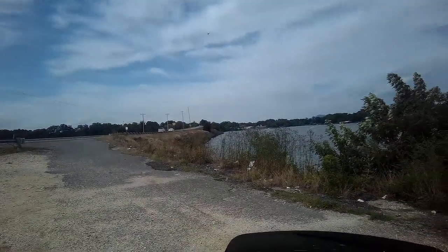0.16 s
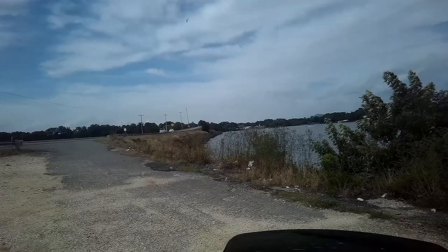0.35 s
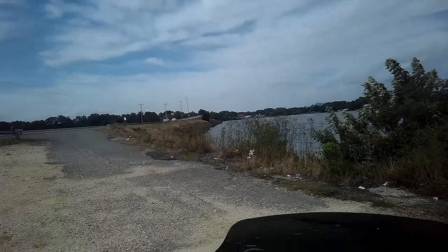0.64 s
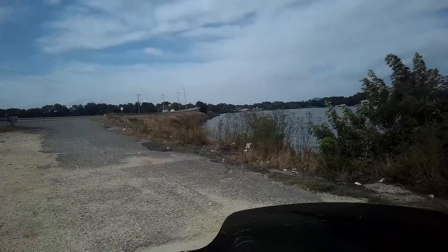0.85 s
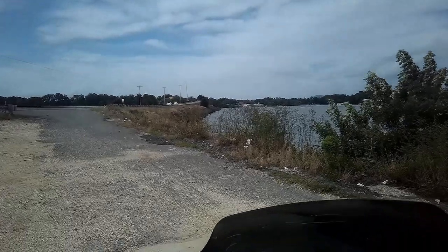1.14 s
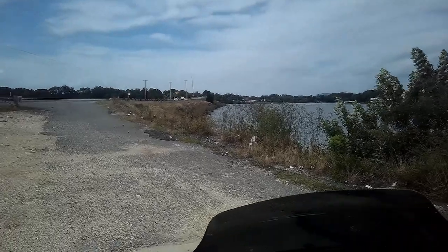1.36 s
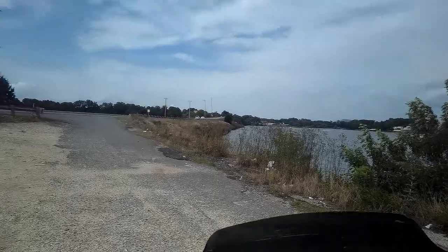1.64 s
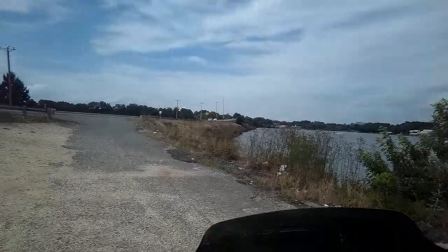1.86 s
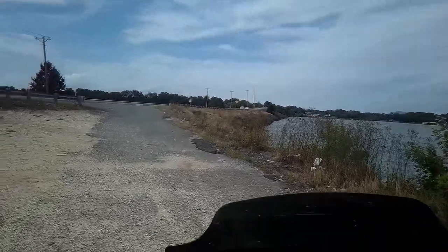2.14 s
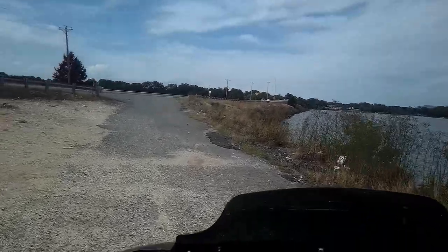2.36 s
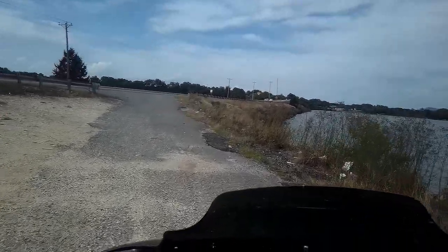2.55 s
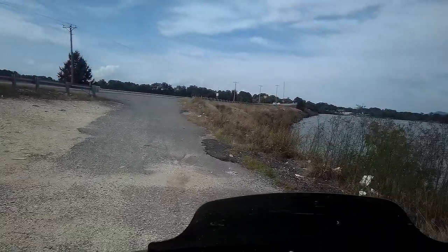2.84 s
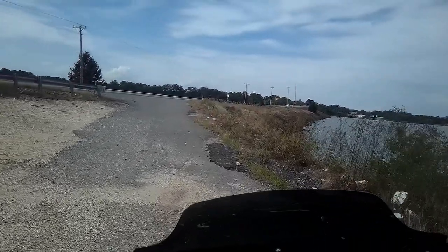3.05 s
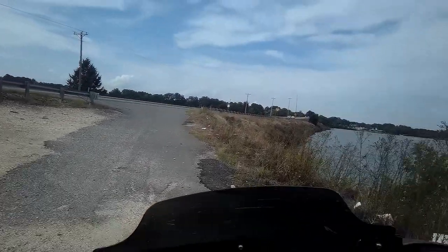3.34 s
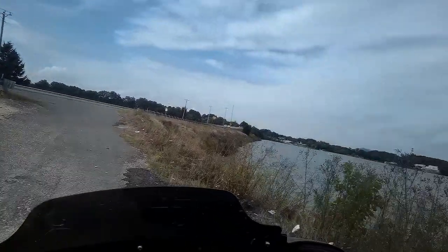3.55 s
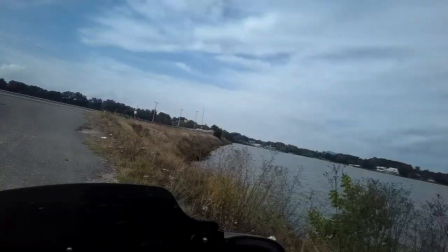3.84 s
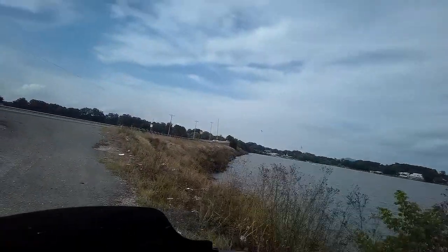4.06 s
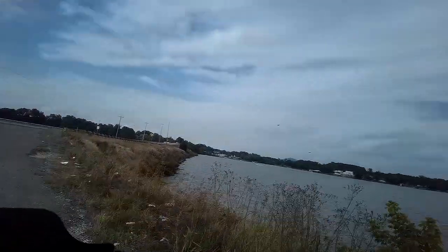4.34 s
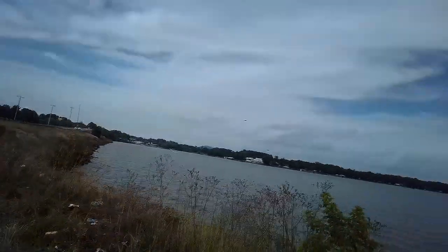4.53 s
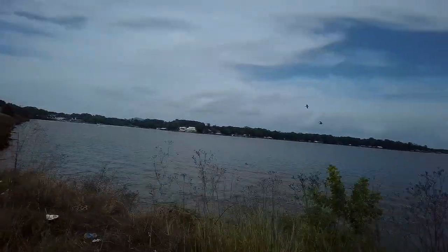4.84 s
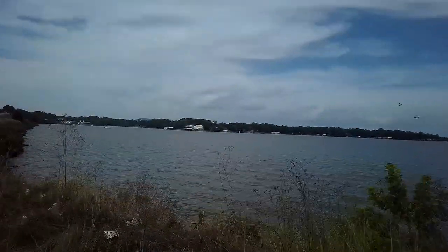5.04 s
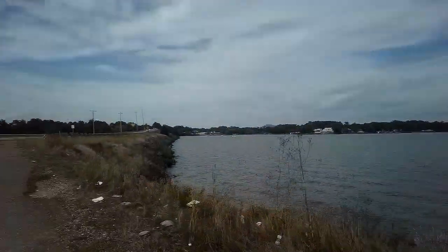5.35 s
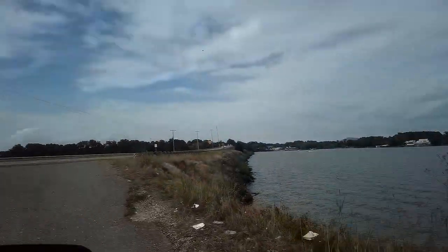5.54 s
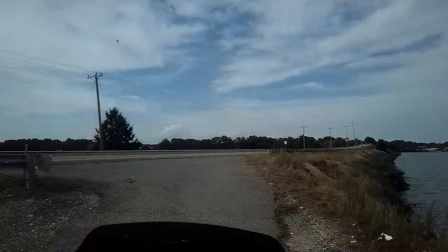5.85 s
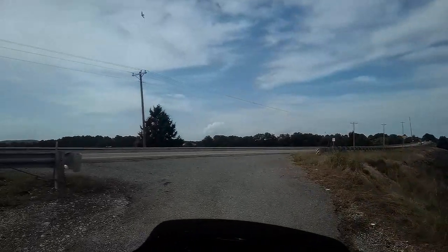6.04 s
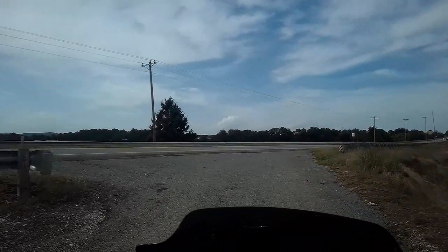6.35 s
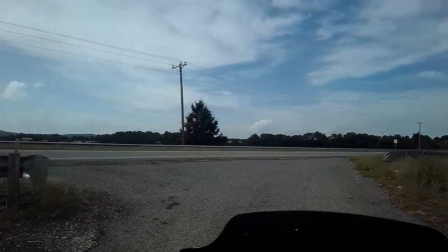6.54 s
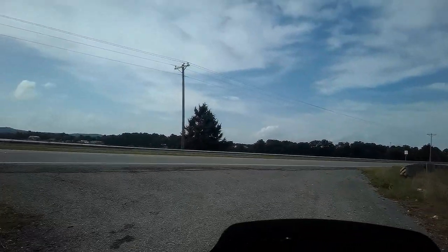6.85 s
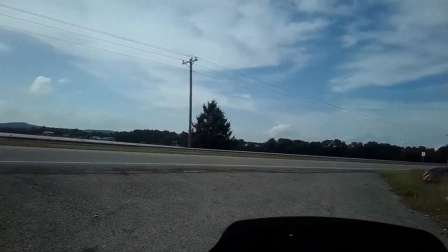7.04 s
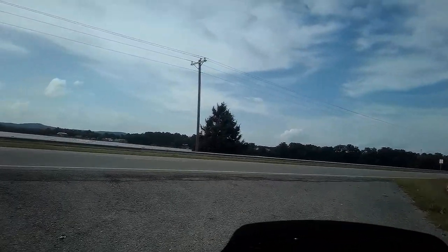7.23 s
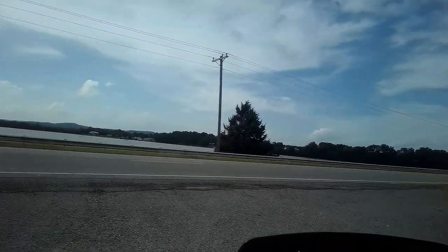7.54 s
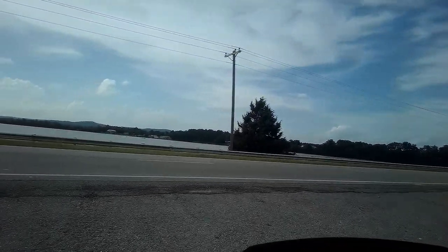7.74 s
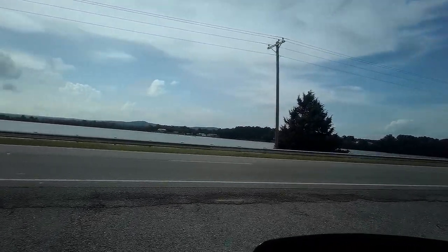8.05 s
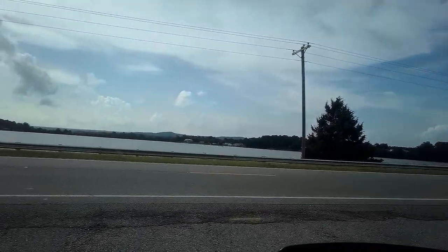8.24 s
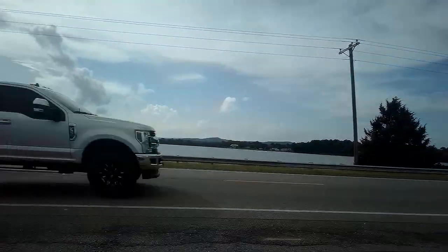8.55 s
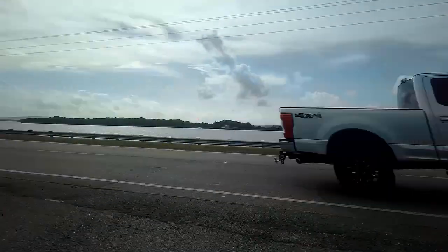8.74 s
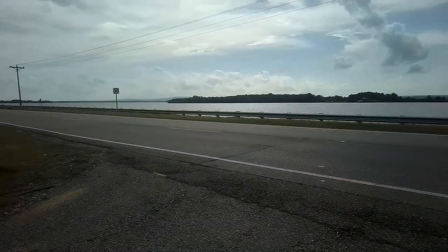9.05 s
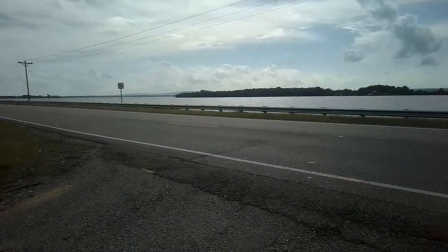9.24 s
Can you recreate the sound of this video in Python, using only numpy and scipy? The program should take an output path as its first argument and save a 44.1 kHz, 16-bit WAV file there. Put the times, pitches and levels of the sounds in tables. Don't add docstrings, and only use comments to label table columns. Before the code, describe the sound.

Close to the rider's head, a large twin-cylinder motorcycle starts in a slow lumpy idle, surges with a throttle blip, and chugs steadily up a lakeside track. Loose metal jingles and valve gear clatters above heavy exhaust thumps. It drops to uneven idle with small clicks, and a pickup passes in a rush of tyre roar and hiss, right to left.

```python
import sys
import numpy as np
from scipy import signal
from scipy.fft import rfft, irfft, next_fast_len
from scipy.io import wavfile
from scipy.ndimage import uniform_filter1d

SR = 44100
rng = np.random.default_rng(int(sys.argv[2]) if len(sys.argv) > 2 else 0)


def ratio(d):
    e = np.asarray(d, float) / 20
    return 10 ** e


def generate_wav(sig):
    pcm = np.round(np.clip(np.atleast_2d(sig).T, -1, 1) * 32767).astype(np.int16)
    wavfile.write(sys.argv[1], SR, pcm)


N = 414090
TIME = np.arange(N) / SR
SIZE = next_fast_len(N)

# start_s, level_db
LOAD = [(0.85, -11), (1.05, -11), (1.6, -11), (2.0, -11.5), (2.55, -11), (2.75, -13.5), (3.4, -13),
        (4.2, -12.5), (4.45, -11), (5.0, -11.5), (5.6, -12), (6.2, -12), (6.9, -12)]
# start_s, speed_rpm
RPM = [(0.88, 1208.5), (0.94, 1457.3), (1.2, 1690.5), (1.3, 1831.1), (1.74, 1476.6), (2.0, 1424.2),
       (2.47, 1470.7), (2.53, 1493.7), (2.77, 1315.9), (3.08, 1301.0), (3.2, 1320.0), (3.85, 1343.1),
       (3.98, 1300.7), (4.35, 1428.7), (5.23, 1596.4), (6.12, 1714.4), (6.91, 1719.5)]
# front_s, front_db, rear_later_s, rear_db
IDLE = [(0.009, -20.5, .087, -25), (0.197, -19.5, .078, -18), (0.367, -16, .0785, -30),
        (0.549, -15, .061, -15.5), (0.684, -13, .046, -10.5), (0.787, -11.5, .041, -12),
        (6.897, -18.5, 0.039, -11), (6.993, -14.5, 0.03, -14), (7.08, -20, .0413, -17),
        (7.183, -22, .0518, -20), (7.295, -14.5, .0608, -22), (7.43, -17, .08, -21),
        (7.588, -16.5, .0785, -18), (7.762, -18, .0796, -19), (7.952, -16, .0758, -29),
        (8.125, -17, 0.063, -20.5), (8.308, -17, 0.066, -27), (8.488, -16.5, .0722, -18.5),
        (8.651, -19, 0.078, -25), (8.833, -16, .0792, -21), (9.014, -17, .0658, -25),
        (9.192, -17, .0711, -19.5), (9.363, -16, .07, -20)]
# start_s, extra_gas_db, extra_clatter_db
HARD = [(0.275, 6, 10), (0.366, -1, 1), (0.549, 2.5, -1.5), (0.61, -1.5, 7.5), (0.684, 3, 2),
        (0.73, 5.5, 3), (0.828, 5, 0.5), (0.919, 5, 2.5), (0.996, 6, 2.5), (1.081, 5.5, 3.5),
        (1.149, 4.5, -1), (1.423, 2.5, -2.5), (1.493, -2, -3.5), (1.535, 0, -0.5), (1.566, 1.5, -1),
        (1.611, 2.5, 4.5), (1.641, 0, -0.5), (1.688, 0.5, 5), (1.969, 5.5, 2.5), (2.1, 2.5, 3),
        (2.302, 3.5, -5.5), (2.384, 5, -4), (2.466, 5, -2), (2.768, 3, -5.5), (5.11, 1, 4),
        (5.184, -1, 6.5), (5.405, 1, 7.5), (5.729, 2.5, 0), (6.365, 3, -6), (7.297, -2.5, 3.5)]
# full_blow_db, slope_db_per_db
FOLLOW = [
    (-21.5, 4),
    (-31, 1.5),
    (-48.5, 1.4),
]
# pitch_hz, level_db, decay_s, rise_per_cycle
THUMP = [
    [(61.5, 3, 0.093, 0.44), (151.5, -5, 0.1, 0.022)],
    [(79.3, 4, 0.12, 0.32), (154.2, -4.5, 0.098, 0.45)],
]
# pitch_hz, level_db, decay_s, rise_per_cycle
CRACK = [
    [(128.5, 5.5, 0.099, 0.29), (211.2, 5.5, 0.018, 0.69), (285, 0.5, 0.019, 0.092)],
    [(133.2, 11, 0.016, 0.56), (248.6, 4.5, 0.018, 0.24), (381, -8.5, 0.027, 0.24)],
]
VALVE_SHUT = (.54, .46)
# pitch_hz, level_db, decay_s
SHUT_RING = [
    (106, -10.5, 0.15),
    (140.2, -8.5, 0.024),
]
# pitch_hz, level_db
GAS_COLOUR = [(280, -18.5), (470, 1), (525, -12.5), (585, -6.5), (684, -9.5), (788, -0.5), (885, -9.5),
              (1040, -5.5), (1210, -9.5), (2200, -19), (2860, -46.5), (4840, -120)]
# pitch_hz, width_hz, level_db
SHELL_PEAKS = [(770, 70, -6), (1060, 38, -3.5), (589, 11, -8)]
# pitch_hz, level_db, decay_s
STRUCK = [(411, -8, 0.014), (591.4, -11, 0.068), (737, -4, 0.018), (1009, -6, 0.012), (1322, -14.5, 0.02),
          (1947, -20.5, 0.0025), (2760, -20.5, 0.0034), (3140, -13.5, 0.0066), (5550, -23.5, 0.0057)]
# pitch_hz, level_db
CLATTER_COLOUR = [(880, -28.5), (1500, -1.5), (2520, -4.5), (2780, -5), (3250, -10), (4150, -11.5),
                  (4550, -18), (5300, -11.5), (7520, -17.5), (8710, -21.5), (14500, -27), (15500, -34)]
# pitch_hz, width_hz, level_db
COVER_RING = (3380, 960, 6.2)
# teeth_per_cycle, level_db
DRIVE = [(14, -32), (17, -24.5), (19, -34.5), (23, -36), (27, -39), (33, -43.5)]
# teeth_per_cycle, level_db, slope_db_per_100_rpm
GEARS = [(25, -41.5, 0.5), (27, -41.5, 0.5), (39, -42.5, -2), (52, -44.5, -1.5)]
# pitch_hz, left_minus_right_db
HEAD_SHADE = [(60, -4), (110, 0), (200, -2), (380, -3.5), (700, -11), (1290, -6.5), (2380, -3), (4400, 1),
              (8120, 11.5), (15000, -1.5)]
# start_s, peak_db, body_db, top_db (both relative), left_minus_right_db
TICKS = [(7.072, -36, -12, -15, 2.5), (7.221, -36.5, -5.5, -10, 6), (7.2716, -31.5, -9, -19, 1),
         (7.333, -35, -6, -20, 4.5), (7.4114, -32.5, 1, -13, 1), (7.457, -41.5, -4, -16.5, 1.5),
         (7.52, -46, -4, -11.5, 2.5), (7.59, -54, 35.5, -20, 6), (7.63, -42.5, -6, -14, 0),
         (7.656, -58, 35.5, -29, -5), (7.9924, -33.5, 1, -19.5, -2), (8.346, -39, -5, -11.5, 5),
         (8.528, -38, -5, -18, 6.5), (8.555, -39, 6, -31, 2), (8.944, -38, -5, -27, -6.5),
         (9.056, -37.5, -2, -25.5, 5), (9.1224, -39, 2, -26, 7), (9.258, -36, 14, -13, 9),
         (9.304, -37, 5, -27, 10)]
# start_s, pitch_hz, level_db
LEVER = [
    (7.272, 2400, -40.5),
    (7.658, 2870, -38),
    (8.554, 2870, -36),
]
# start_s, peak_db, pitch_hz,
# left_minus_right_db
JINGLE = [(0.1967, -47, 2950, -3), (0.273, -36, 2450, -11), (0.3658, -34.5, 2990, -1),
          (0.5477, -45, 3170, 2), (0.612, -30.5, 2840, -13), (0.6813, -29.5, 2950, -9),
          (0.6982, -32.5, 2780, -6), (0.7275, -41, 3210, -8.5), (0.8246, -32.5, 2770, -15),
          (0.878, -35.5, 3180, -6), (0.9146, -32, 2950, -9), (1, -32.5, 2630, -12), (1.0428, -38, 2430, -1),
          (1.0762, -24, 2760, -5), (1.1937, -42, 3140, 1), (1.694, -23, 3210, 4.5), (1.7822, -25, 3200, -5),
          (1.856, -25.5, 2900, -3), (1.9404, -25, 3230, -6), (1.9686, -28, 2900, -5.0),
          (2.1058, -35, 2760, -6), (2.14, -35.5, 2620, -10.5), (2.1884, -29.5, 2620, -4),
          (2.304, -30.5, 2870, -9), (2.4361, -32, 2930, -2), (2.4671, -28.5, 2640, -8),
          (2.515, -33, 3210, -3), (2.5477, -32, 3020, -7), (2.7167, -33, 2550, 0), (2.7744, -35, 2930, 0),
          (2.8992, -34, 3060, -11.5), (2.9924, -38, 3090, -5), (3.0822, -35, 2970, -12),
          (3.1374, -34.5, 3500, -4), (3.177, -36.5, 3520, -3), (3.3216, -41, 2650, -7.5),
          (3.4119, -40, 2760, -8), (3.447, -38, 2630, -12), (3.5388, -41, 3140, -10),
          (4.2183, -35, 3160, -2.0), (4.3412, -31.5, 2650, -5), (4.831, -41, 3100, -5.0),
          (4.9514, -32.5, 2650, -6), (5.03, -31.5, 2720, -1), (5.108, -26, 2700, -7.5),
          (5.1809, -29.5, 2690, -8.5), (5.3314, -29.5, 2460, -8), (5.403, -39.5, 2940, 6),
          (0.215, -49, 2900, -7), (0.292, -39, 2670, -6), (0.312, -49, 2600, -5), (0.296, -42, 1690, -5),
         (0.387, -39, 3000, -5), (0.371, -42, 2300, -6), (0.385, -49, 1900, -2), (0.41, -51, 2660, -3),
         (0.567, -39, 3070, -9), (7.302, -47, 2850, 0), (7.587, -44, 2700, -5), (7.676, -42, 3120, -2)]
# start_s, level_db, lowest_ring_hz
BOOM = [(0.195, -25.5, 710), (0.271, -22, 740), (0.361, -28, 740), (0.546, -27, 720), (0.61, -16, 736),
        (0.678, -34, 777), (0.724, -12.5, 732), (0.784, -34, 790), (0.823, -18.5, 688), (0.876, -21.5, 765),
        (0.917, -14.5, 730), (0.996, -16, 735), (1.15, -21, 780), (1.327, -16, 740), (1.394, -21.5, 830),
        (1.423, -17.5, 836), (1.493, -19, 800), (1.535, -18.5, 824), (1.566, -20, 730), (1.611, -18, 875),
        (1.641, -18, 770), (1.721, -16, 753), (1.767, -20.5, 815), (1.849, -17, 828), (1.885, -19, 743),
        (1.932, -21.5, 685), (1.969, -29.5, 760), (2.016, -19.5, 758), (2.053, -16, 756), (2.1, -26, 836),
        (2.136, -24, 718), (2.184, -22.5, 660), (2.219, -18, 725), (2.302, -19.5, 733), (2.384, -20, 790),
        (2.431, -24, 826), (2.466, -19.5, 790), (2.547, -18, 720), (2.631, -23, 810), (2.718, -22.5, 820),
        (2.768, -27, 711), (3.225, -22.5, 732), (3.408, -25, 816), (3.861, -26.5, 860), (3.949, -26.5, 830),
        (4.129, -24, 790), (4.219, -25, 789), (4.634, -22, 685), (4.715, -25, 754), (4.916, -22.5, 767),
        (4.951, -20, 757), (5.729, -19.5, 774), (5.8, -17.5, 766), (5.871, -22, 759), (6.053, -28.5, 737),
        (6.294, -23.5, 805), (6.365, -18, 770), (6.544, -27.5, 830), (6.824, -24.5, 705), (7.272, -25, 760)]
# pitch_hz, level_db, decay_s
BOOM_MODES = [(728.6, -4, 0.012), (982, -6.5, .009), (1244, -12.5, .007), (1785, -15.5, 0.005)]
# start_s, peak_db, pitch_hz, left_minus_right_db
PING = [(0.2765, -53, 5300, 5), (0.6078, -52, 5550, 15.5), (0.73, -35, 5580, 12.5),
        (0.829, -36, 4980, 13.5), (1.197, -38.5, 6470, 9.5), (1.6472, -40, 4670, 4.5),
        (1.6932, -46, 4630, 8.5), (1.7801, -36.5, 5600, 5.5), (1.938, -41, 4940, 8),
        (2.0228, -40.5, 4980, 6.5), (2.0555, -42.5, 5700, 0), (2.1872, -43, 5170, 9),
        (2.271, -48.5, 4650, 9), (2.386, -47, 4640, 6.0), (2.4712, -42, 4900, 3.5), (2.518, -42.5, 5230, 9),
        (2.956, -41, 4940, 8.5), (3.1331, -52, 5490, 10.0), (3.6668, -47.5, 4610, 11),
        (4.0799, -46, 4940, 3.5), (4.5533, -46, 4450, 9.5), (4.6216, -40, 6200, 0),
        (4.7177, -43.5, 4470, 11), (4.8747, -46, 4520, 8.5), (4.953, -45.5, 4760, 6),
        (5.0312, -39.5, 6050, 15), (5.1063, -42, 4610, 8.5), (5.1847, -40, 4560, 6),
        (5.2582, -40.5, 5650, 4.5), (5.4096, -42.5, 4480, 11), (5.481, -44.5, 4480, 7),
        (6.0539, -46, 4730, 10.5), (6.1277, -47, 4740, 10), (6.2714, -44.5, 4870, 7.5),
        (6.3358, -47, 4600, 8.5), (6.6226, -42, 4570, 7), (6.674, -43.5, 4810, 8)]
# pitch_hz, level_db
AIR_COLOUR = [(120, -26.5), (200, -1.5), (231, -3), (422, -12.5), (702, -17.5), (975, -18.5), (1110, -20),
              (2340, -35.5), (3240, -36.5), (4580, -43), (15500, -62)]
# pitch_hz, level_db
ROAR_COLOUR = [(260, -36), (450, -10), (487, 2), (531, -9), (591, -1.5), (771, -1), (840, -2), (1140, -4),
               (2200, -27.5), (2860, -60), (4840, -120)]
PASS_S = 8.52, 8.82, 8.58, 9.3
# nearest_distance_s (time to cover it), nearest_db, louder_behind_db
PASSES = [
    (0.28, -28.5, 6.5),
    (0.18, -38, 0.5),
    (0.31, -51.5, 0.5),
    (0.26, -37.5, 6.5),
]
# middle_s, pitch_hz, length_s (from the middle out), level_db
TREAD = [
    (8.3, 916, .08, -38),
    (8.38, 735, .1, -29.5),
    (8.55, 720, 0.053, -45),
    (8.64, 865, 0.077, -33),
    (8.75, 660, 0.089, -39),
    (8.88, 512, .08, -39),
    (8.99, 560, .06, -33),
    (9.1, 855, 0.24, -35),
]

REAR_SHARE = 315 / 720
THROTTLE_S, CLUTCH_OUT_S, RIDE_CYCLES = 0.8812, 6.86, 76
MIC_LAG_S = -.0003


def unit(x):
    return x / np.sqrt(np.mean(x ** 2))


def on_hz(points):
    hz, db = np.transpose(points)
    return np.interp(np.log(np.fft.rfftfreq(SIZE, 1 / SR) + 1), np.log(hz), db)


def colour(x, points):
    return irfft(rfft(x, SIZE) * ratio(on_hz(points)), SIZE)[..., :N]


def band(x, lo_hz, hi_hz):
    return signal.sosfilt(signal.butter(2, [lo_hz, hi_hz], "bandpass", fs=SR, output="sos"), x)


def resonance(x, hz, width_hz, db):
    return ratio(db) * signal.lfilter(*signal.iirpeak(hz, hz / width_hz, SR), x)


def ramp(x):
    return 1 / (1 + np.exp(-x))


def sides(left_minus_right_db):
    return ratio(np.array([[left_minus_right_db], [-left_minus_right_db]]) / 2)


def walk(rate):
    k = int(SR / rate)
    return uniform_filter1d(np.repeat(rng.standard_normal(N // k + 1), k), k)[:N]


def both_mics(likeness):
    same, left, right = rng.standard_normal((3, N))
    c = np.clip(likeness, 0, 1)
    shared = np.array([same, np.roll(same, int(MIC_LAG_S * SR))])
    return np.sqrt(c) * shared + np.sqrt(1 - c) * np.array([left, right])


def add(out, at, x):
    i = int(at * SR)
    out[..., max(i, 0):i + x.shape[-1]] += x[..., max(-i, 0):N - i]


def mode(t, hz, db, decay, rise, cycle):
    t = np.maximum(t, 0)
    return ratio(db) * np.sin(2 * np.pi * hz * (t + rise * t * t / cycle / 2)) * np.exp(-t / decay)


def speed_rpm():
    return np.interp(TIME, *np.transpose(RPM))


def turns():
    return np.cumsum(speed_rpm() * (TIME >= THROTTLE_S)) / 120 / SR


def strokes():
    idle_pitch, idle_wander, full_db = .91, 0.04, -10
    coast_crack_db = 5
    cold_db, cold_s = 9.5, 4.3
    front = np.interp(np.arange(RIDE_CYCLES + 1) + 1e-6, turns(), TIME)
    ride = np.append(front[:-1], front[:-1] + REAR_SHARE * np.diff(front))
    first, first_db, later, later_db = np.transpose(IDLE)
    s = np.concatenate([ride, first, first + later])
    blow = np.concatenate([np.interp(ride, *np.transpose(LOAD)), first_db, later_db])
    idling = np.arange(len(s)) >= len(ride)
    chance = rng.standard_normal((len(s), 6)).T
    pitch = np.where(idling, idle_pitch + idle_wander * chance[5], 1 + .002 * chance[5])

    levels = np.array([blow, *(db + slope * (blow - full_db) for db, slope in FOLLOW)])
    levels = levels + np.array([[.4], [.6], [1.2], [1.8]]) * chance[:4]
    levels[1] += coast_crack_db * (s > CLUTCH_OUT_S + .2)
    levels[3] += cold_db * np.exp(-s / cold_s)
    for at, gas_db, clatter_db in HARD:
        levels[2:, np.argmin(abs(s - at))] += gas_db, clatter_db

    rows = np.vstack([s + .0001 * chance[4], levels, pitch])[:, np.argsort(s)][:, :-1]
    cycle = rows[0, 2:] - rows[0, :-2]
    cylinder = np.arange(rows.shape[1]) % 2
    return np.vstack([rows[0], cylinder, np.append(cycle, cycle[-2:]), rows[1:]]).T


def cycle_s(rows):
    return np.interp(TIME, rows[:, 0], rows[:, 2])


def rumble():
    return unit(band(rng.standard_normal(N), 22, 42)) * ratio(-35 + 2.7 * walk(5.4)) * sides(-5.2)


def air(rows):
    idle_db, per_octave_db, lag_s, road_db_s = -36.5, 5, 0.44, 0.25
    still_db, still_until_s = -4, 0.63
    octaves = uniform_filter1d(np.log2(0.2 / cycle_s(rows)), int(lag_s * SR))
    db = idle_db + per_octave_db * octaves + road_db_s * TIME
    db = db + still_db * ramp((still_until_s - TIME) / 0.0067)
    wash = unit(colour(both_mics(0.22), AIR_COLOUR)) * ratio(db + .5 * walk(3.9))
    return wash + band(both_mics(0), 9000, 15500) * ratio(-61.0)


def passing(at_s, reach_s, db, behind_db):
    spread = 1.46
    along = (TIME - at_s) / reach_s
    far = np.hypot(along, 1)
    return db - 20 * spread * np.log10(far) + behind_db * along / far


def doppler(x):
    truck_m_s, nearest_m = 22, 6
    heard = TIME - np.hypot(truck_m_s * (TIME - PASS_S[2]), nearest_m) / 343
    return np.array([np.interp(heard, TIME, mic) for mic in x])


def truck():
    sweep_at_s, sweep_width_s, sweep_db, sweep_mid_db = 8.75, 0.28, 11, -11.5
    clear_at_s = 7.9
    roar_db, hiss_db, sizzle_db, traffic_db = (passing(s, *row) for s, row in zip(PASS_S, PASSES))
    pan_db = sweep_mid_db + sweep_db * np.tanh((TIME - sweep_at_s) / sweep_width_s)
    side_db = np.array([pan_db + 16.0, -pan_db - 10.5]) / 2
    near = np.clip((TIME - clear_at_s) / 0.2, 0, 1)
    flicker_db = .7 * walk(25)

    roar = unit(doppler(colour(both_mics(0.071), ROAR_COLOUR))) * ratio(roar_db + flicker_db + side_db)
    traffic = unit(band(both_mics(0.12), 650, 1300)) + 0.4 * unit(band(both_mics(.3), 830, 870))
    traffic = traffic * ratio(traffic_db + 2.5 * walk(26)) * sides(3)
    hiss = unit(band(both_mics(0.051), 1410, 2900)) * ratio(hiss_db)
    hiss = hiss + unit(band(both_mics(0.11), 2700, 4300)) * ratio(sizzle_db + 2.5)
    hiss = hiss + unit(band(both_mics(0.079), 4600, 9000)) * ratio(hiss_db - 22.5)
    body = unit(band(both_mics(0.87), 250, 480)) * ratio(hiss_db + 1.0) * ramp((TIME - 8.45) / .06)
    return near * (roar + body + traffic + hiss * ratio(flicker_db))


def tread():
    fall_per_s, wander = .04, 1.5
    out = 0
    for s, hz, length, db in TREAD:
        t = TIME - s
        phase = 2 * np.pi * hz * (t - fall_per_s * t * t / 2) + wander * np.array([walk(40), walk(40)])
        out = out + ratio(db + 2.5 * walk(30)) * np.exp(-(t / length) ** 2) * np.sin(phase)
    return out * sides(-5)


def ticks():
    out, t = np.zeros((4, 2, N)), np.arange(1024) / SR
    for (s, db, body_db, top_db, pan_db), noise in zip(TICKS, rng.standard_normal((len(TICKS), 2, 1024))):
        band_db = np.array([body_db + 8.0, 0, top_db])[:, None]
        gains = ratio(db + band_db + np.array([pan_db, -pan_db]) / 2)
        add(out[:3], s, gains[..., None] * noise * np.exp(-t / 0.0031))
    for s, hz, db in LEVER:
        add(out[3], s, mode(t, hz, db, 0.0086, 0, 1))
    clicks = band(out[0], 660, 1210) + band(out[1], 1900, 6000) + band(out[2], 7100, 15000)
    return ratio(3.5) * clicks + out[3]


def pings():
    out, t = np.zeros((2, N)), np.arange(1024) / SR
    for (s, db, hz, pan_db), tune in zip(PING, rng.standard_normal((len(PING), 2, 3, 1))):
        rings = mode(t, hz * (1 + 0.047 * tune), db - 12.5, 0.0079, 0, 1).sum(axis=1)
        add(out, s - .001, rings * sides(pan_db))
    return out


def jingles():
    decay_s, spread = .009, .11
    out, t = np.zeros((2, N)), np.arange(3072) / SR
    events = JINGLE
    for (s, db, hz, pan_db), chance in zip(events, rng.standard_normal((len(events), 3, 2, 12, 1))):
        tune, size, late = chance
        ring_db = db - 13 + 2.5 * size
        rings = mode(t - .006 * late ** 2, hz * (1 + spread * tune[0]), ring_db, decay_s, 0, 1)
        add(out, s - .002, rings.sum(axis=1) * sides(pan_db))
    return out


def booms():
    boom_db, scatter_db, snap_db, snap_s = -4.5, 1.5, -5, 0.0053
    out, t = np.zeros((2, N)), np.arange(3072) / SR
    sizes = rng.standard_normal((len(BOOM), len(BOOM_MODES)))
    snaps = band(rng.standard_normal((len(BOOM), 2, 3072)), 900, 3400)
    for (s, db, low_hz), size, snap in zip(BOOM, sizes, snaps):
        tune = low_hz / BOOM_MODES[0][0]
        ring = sum(mode(t, hz * tune, mode_db + scatter_db * k, decay, 0, 1)
                   for (hz, mode_db, decay), k in zip(BOOM_MODES, size))
        boom = ring * (1 - np.exp(-t / 0.00073)) + ratio(snap_db) * snap * np.exp(-t / snap_s)
        add(out, s - .002, boom * ratio(db + boom_db) * sides(-7))
    return out


def drive():
    sings_rpm, span_rpm, gears_rpm = 1407, 258, 1400
    cycles, rpm = turns(), speed_rpm()
    hum, whirr = 0, 0
    for teeth, db in DRIVE:
        hum = hum + ratio(db + 1.8 * walk(13)) * np.sin(2 * np.pi * np.round(teeth) * cycles + .5 * walk(11))
    for teeth, db, slope in GEARS:
        level = ratio(db + slope * (rpm - gears_rpm) / 100 + 2.6 * walk(3))
        whirr = whirr + level * np.sin(2 * np.pi * np.round(teeth) * cycles + 0.9 * walk(15))
    fast = np.clip((rpm - sings_rpm) / span_rpm, 0, 1)
    engaged = ramp((CLUTCH_OUT_S - TIME) / 0.027)
    return (hum * fast + whirr * np.clip(cycles / 8, 0, 1)) * engaged * sides(-5)


def puffs(rows, column, steady, sharp_s, long_s, share):
    out, t = np.zeros(N), np.arange(4096) / SR
    shape = (1 - np.exp(-t / 0.0034)) * (np.exp(-t / sharp_s) + share * np.exp(-t / long_s))
    for row in rows:
        add(out, row[0] - .005, ratio(row[column]) * shape)
    busy = (0.1 / cycle_s(rows)) ** 0.38
    return out + steady * busy * uniform_filter1d(out, SR // 6)


def clatter(rows):
    grit = ratio(1.6 * walk(500))
    knocks = puffs(rows, 6, steady=0.35, sharp_s=0.0011, long_s=0.03, share=0.35)
    rattle = both_mics(0.12) * knocks * grit
    return colour(rattle + resonance(rattle, *COVER_RING), CLATTER_COLOUR) * ratio(19.0)


def shell(rows):
    struck_db, scatter_db, detune, drift_share = 4, 1.2, .015, .015
    out, t = np.zeros((2, N)), np.arange(2048) / SR
    drift = 1 + drift_share * np.array([walk(1.5) for _ in STRUCK])
    hz, db, decay = np.transpose(STRUCK)[..., None]
    shift = 2 * np.pi * hz * MIC_LAG_S * np.array([0, 1])[:, None, None]
    for row, (size, tune) in zip(rows, rng.standard_normal((len(rows), 2, len(STRUCK), 1))):
        now = min(int(row[0] * SR), N - 1)
        pitch = hz * np.sqrt(row[7]) * (drift[:, [now]] + detune * tune)
        ring = np.sin(2 * np.pi * pitch * t - shift) * np.exp(-t / decay)
        blow = ratio(row[5] + struck_db) * (1 - np.exp(-t / 0.0031))
        add(out, row[0] - .004, blow * (ratio(db + scatter_db * size) * ring).sum(axis=1))
    return out


def repeats(rows):
    out, t = np.zeros((2, N)), np.arange(4096) / SR
    blows = both_mics(0.49)[:, :8192].reshape(2, 2, 4096)
    blows = blows * (1 - np.exp(-t / 0.0013)) * np.exp(-t / .02)
    for row in rows:
        add(out, row[0] - .004, ratio(row[5] + 1) * blows[:, int(row[1])])
    return out


def gas(rows):
    chest_hz, chest_idle_db, chest_open_s = 620, -11.5, 0.094
    blow = puffs(rows, 5, steady=0.35, sharp_s=0.0037, long_s=0.028, share=0.27)
    rush = both_mics(0.21) * blow * ratio(1.4 * walk(120) - 3) + .6 * repeats(rows)
    ringing = sum(resonance(rush, *peak) for peak in SHELL_PEAKS)
    whole = colour(rush + ringing, GAS_COLOUR) * ratio(26.5)
    chest = colour(whole, [(chest_hz * .9, 0), (chest_hz * 1.1, -40)])
    idling = ramp((cycle_s(rows) - chest_open_s) / 0.014)
    return whole - chest * idling * (1 - ratio(chest_idle_db))


def exhaust(rows):
    lead, valve_soft = .01, 0.086
    heat, heat_cycle_s = 0.041, 0.073
    coast_overtone_db = -3
    out = np.zeros(N)
    for s, cylinder, cycle, thump_db, crack_db, _, _, pitch in rows:
        t = np.arange(int((.6 * cycle + .1) * SR)) / SR - lead
        k = int(cylinder)
        warm = pitch * (cycle / heat_cycle_s) ** -heat
        (hz, db, decay, rise), overtone = THUMP[k]
        ring = -mode(t + 1 / (4 * hz * warm), hz * warm, db + thump_db, decay, rise, cycle)
        overtone_db = thump_db + coast_overtone_db * (s > 7.4)
        upper_db = [overtone_db, crack_db, crack_db, crack_db]
        for (hz, db, decay, rise), blow_db in zip([overtone, *CRACK[k]], upper_db):
            ring = ring + mode(t + 3 / (4 * hz * warm), hz * warm, db + blow_db, decay, rise, cycle)
        ring = ring * ramp((VALVE_SHUT[k] - t / cycle) / valve_soft)
        hz, db, decay = SHUT_RING[k]
        ring = ring - mode(t - VALVE_SHUT[k] * cycle, hz * warm, db + thump_db, decay, 0, cycle)
        add(out, s - lead, ring * np.minimum((t[-1] - t) / .025, 1))
    return out * ratio(np.array([[0.3], [6.2]]))


def scene():
    rows = strokes()
    lean = on_hz(HEAD_SHADE) / 2
    mix = air(rows) + truck() + clatter(rows) + shell(rows) + gas(rows)
    shaded = irfft(rfft(mix, SIZE) * ratio(np.array([lean, -lean])), SIZE)[:, :N]
    loose_metal = ticks() + pings() + jingles() + booms()
    return rumble() + shaded + tread() + loose_metal + drive() + exhaust(rows)


def top_cut(x):
    return signal.sosfilt(signal.butter(12, 15660, fs=SR, output="sos"), x)


def record(dry):
    low_cut = signal.butter(2, 32, "highpass", fs=SR, output="sos")
    thin = signal.sosfiltfilt(low_cut, dry, padtype="even")
    rounded = thin / (1 + abs(thin / 1.03) ** 6) ** (1 / 6)
    return top_cut(np.clip(rounded, -.98, .98))


dry = scene()
out = record(dry)
generate_wav(out)
```